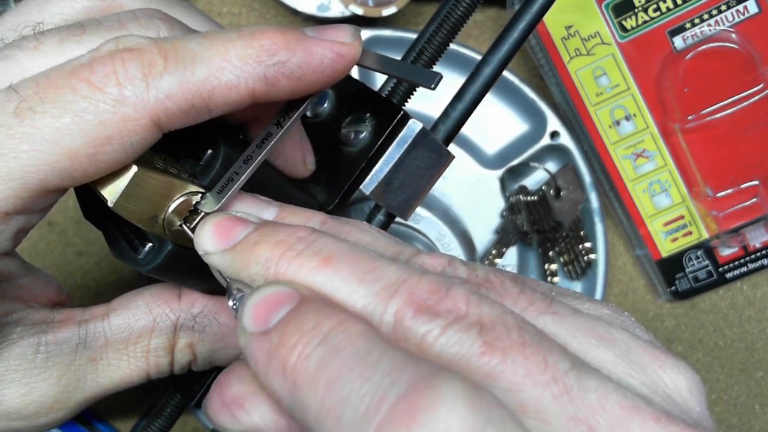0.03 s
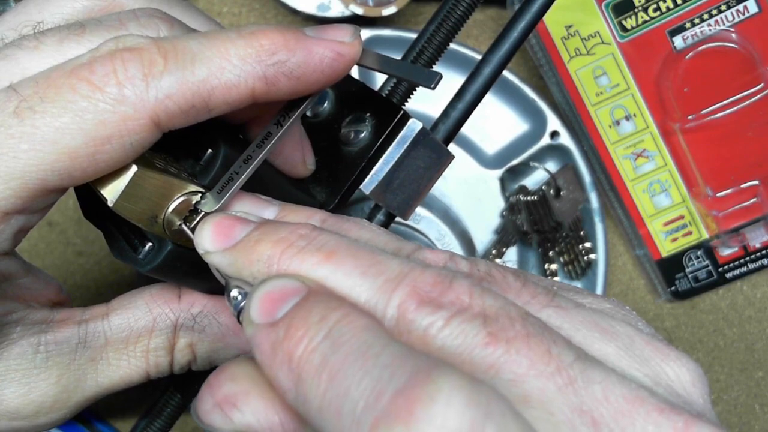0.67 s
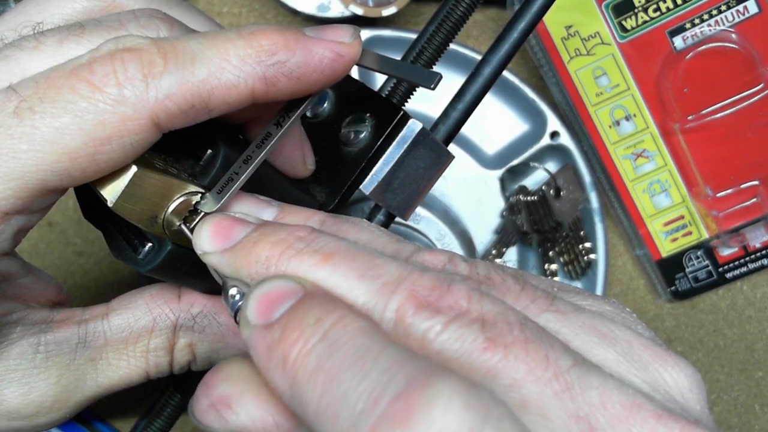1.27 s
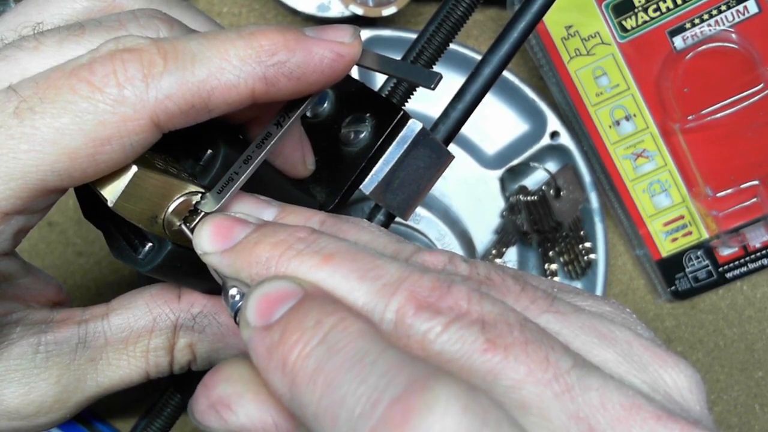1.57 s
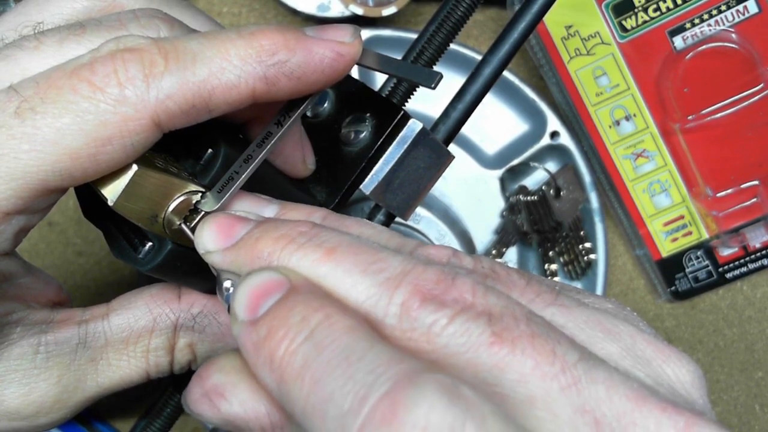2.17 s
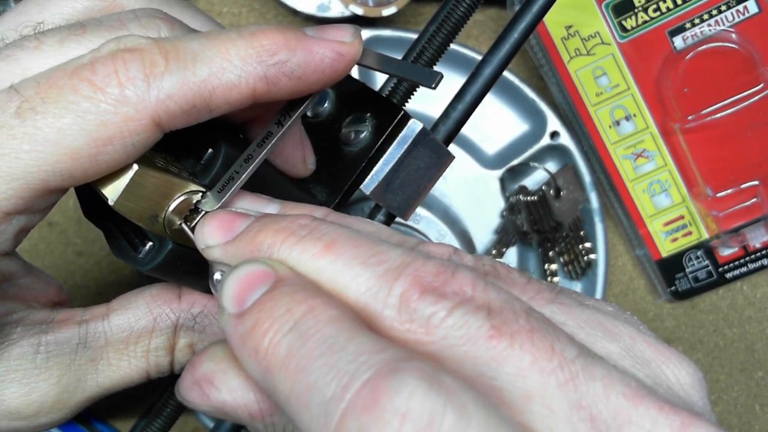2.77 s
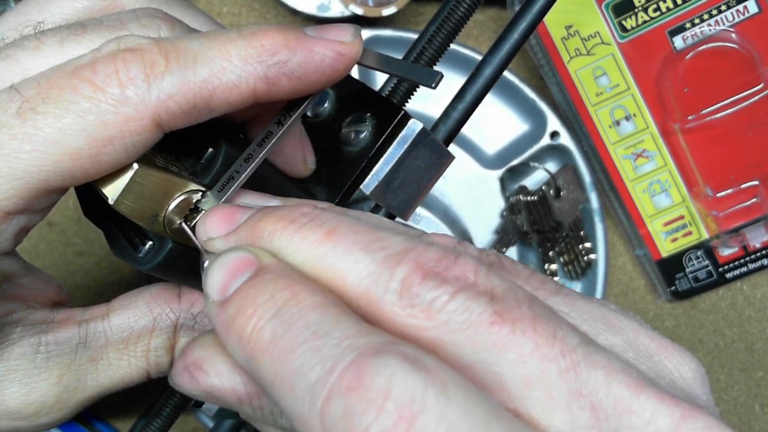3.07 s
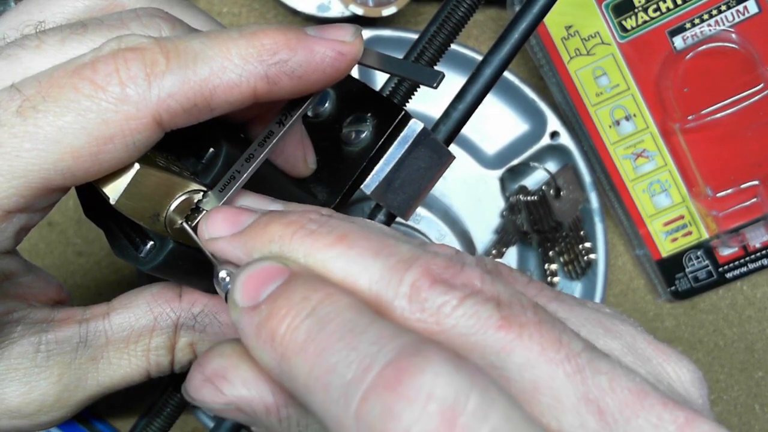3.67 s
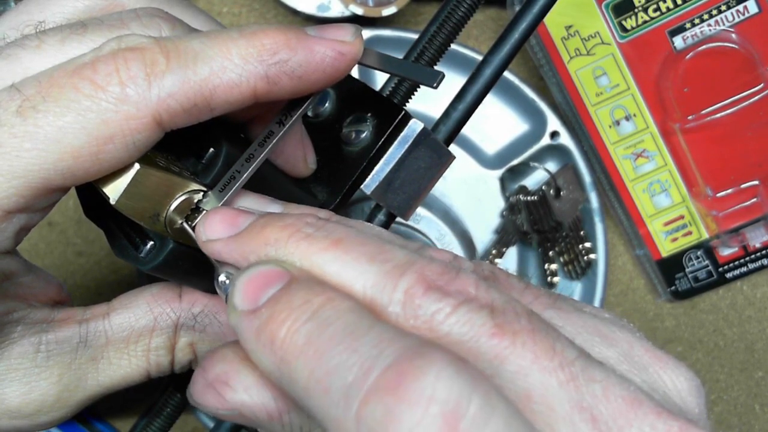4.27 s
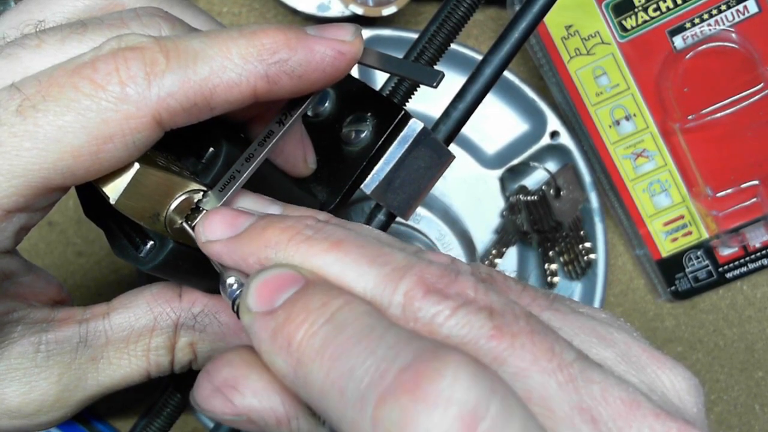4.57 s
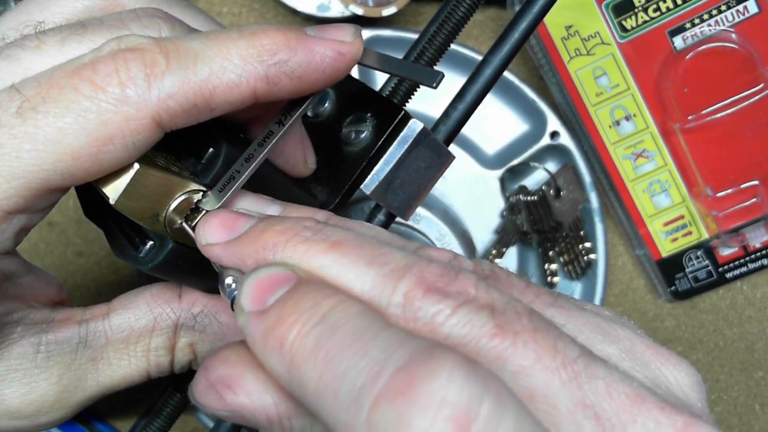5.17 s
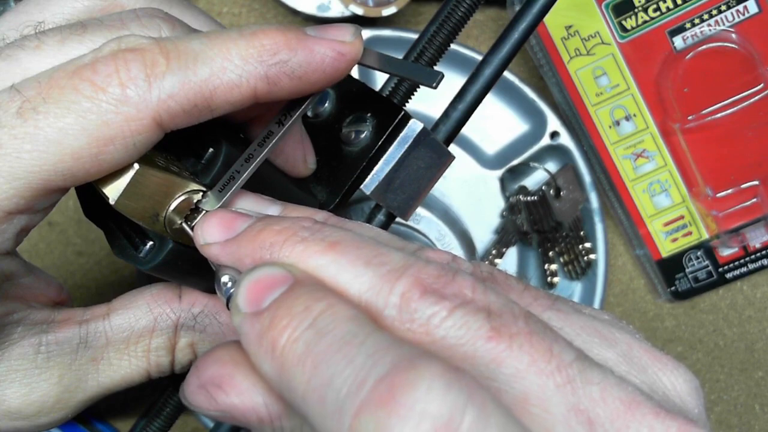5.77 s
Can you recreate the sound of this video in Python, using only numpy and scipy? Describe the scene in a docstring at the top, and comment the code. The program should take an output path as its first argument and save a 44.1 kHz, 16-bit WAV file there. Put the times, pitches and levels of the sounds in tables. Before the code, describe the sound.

Close, quiet lock picking at a workbench: thin steel clicks and tiny scrapes come at uneven intervals as a pick pushes the pins of a padlock. Fingers rub and bump the vise, giving soft dull knocks and deep shudders. The sharpest snaps come after about two seconds and again past the middle. A steady hiss and faint traffic lie underneath, and a far motor whines upward late on.

```python
"""Steel scrapes and snaps over dull knocks: a pick works the pins of a padlock held in a small vise.
Each contact excites the resonances of pick and lock, each push rings the damped modes of the vise,
and the hands set the bench, with the camera on it, swaying at a very low pitch.
Behind the microphone's hiss, faint traffic swells, thin tones come and go, and a far motor runs up."""
import sys
import numpy as np
from scipy import signal
from scipy.fft import rfft, irfft, next_fast_len
from scipy.io import wavfile
from scipy.ndimage import uniform_filter1d, map_coordinates

SR = 44100
rng = np.random.default_rng(int(sys.argv[2]) if len(sys.argv) > 2 else 0)


def dump(signal):
    """Clip the signal to [-1, 1] and save it as 16-bit WAV at the path in sys.argv[1]."""
    limited = np.clip(np.atleast_2d(signal).T, -1, 1)
    pcm = np.round(limited * 32767).astype(np.int16)
    wavfile.write(sys.argv[1], SR, pcm)


N = 260631

BAND_LIMIT_HZ = 15750
# normal modes of the clamped lock: pitch_hz, level_db, t60_s
VISE_MODES = [(180.9, 4, 0.18), (308, -9.5, 0.079), (396.5, 2, 0.073), (453, -13.5, 0.13),
              (537, -15.5, 0.18)]


def pin_snaps(snap=2.9, chatter=0.44, tail_db=-29, tail_t60_s=0.32):
    """Impulse excitation: a pin lets go with one snap, chatters briefly and dies away in a faint room tail."""
    # pin releases: start_s, relative_db, chatter_t60_s, centre_hz, spread_octaves, ring_db
    releases = [(2.0057, -63.5, 0.027, 9000, 1.8, -3), (2.204, -54, 0.014, 9000, 1.4, 6),
                (2.2176, -41.5, .011, 6000, 1.15, 5), (2.2228, -59, .012, 9300, .8, 0),
                (2.2178, -47, 0.016, 4020, 0.094, 1.5), (2.246, -62, 0.0202, 1483, 0.22, -6),
                (2.548, -67, .02, 11700, .15, -2), (2.645, -64, 0.023, 2600, 0.37, -11),
                (2.9385, -63, .005, 10000, 1.8, -6), (3.06, -66.5, .015, 5970, 0.77, 2),
                (3.174, -64, 0.017, 6100, 1.5, -6), (3.3064, -53, .005, 12000, .6, -16),
                (3.3117, -49.5, .007, 7000, .65, -12), (3.3265, -62, .008, 7000, .5, -8),
                (3.4286, -50.5, 0.023, 1030, 0.82, -4), (3.4286, -47, 0.0091, 5300, 0.69, -25),
                (3.438, -57, 0.0076, 8070, 1.7, -12.5), (3.524, -65, 0.0095, 7000, 1, 2),
                (4.5297, -49.5, .012, 5700, .6, -3), (4.5314, -49.5, .014, 5200, .45, -2),
                (4.543, -46.5, .011, 2000, 1.9, -9), (5.627, -70, .04, 4060, .12, 1)]
    out, t = np.zeros(N), np.arange(SR // 10) / SR
    for start_s, relative_db, t60_s, centre_hz, spread_octaves, ring_db in releases:
        decay = amp(-60 * t / t60_s) + amp(tail_db - 60 * t / tail_t60_s)
        force = chatter * rng.standard_normal(len(t)) * decay
        force[0] = snap
        click = amp(relative_db - 3) * steel(force, centre_hz, spread_octaves, ring_db)
        add(out, start_s - 64 / SR, click)  # the steel's response has a 64-sample lead-in
    return out


def pick_scrapes(grain_db=3, ring_db=-4):
    """Stick-slip friction: the pick slides along the keyway in short swells of tiny uneven slips."""
    # strokes of the pick: middle_s, length_s, level_db, centre_hz, spread_octaves
    strokes = [(1.052, 0.02, -62.5, 940, 0.68), (1.053, 0.028, -76.5, 6700, 0.3),
               (1.064, .024, -83.5, 4100, 0.09), (1.96, .03, -85, 5000, 0.89),
               (2.009, 0.023, -72.5, 900, 0.87), (2.16, 0.034, -85, 7350, .2),
               (2.191, 0.039, -78, 5000, 0.86), (2.208, 0.067, -69.5, 1100, 0.89),
               (2.209, .016, -73, 6000, 1.6), (2.959, .08, -85, 12500, 0.27),
               (3.012, 0.15, -86, 7500, 0.68), (3.429, 0.068, -77.5, 7000, 1.8),
               (3.597, 0.21, -89, 6960, 0.4), (3.671, 0.049, -83.5, 8000, 0.89),
               (4.544, 0.012, -67, 1600, 0.82), (5.116, .05, -83.5, 6550, 0.3)]
    out = np.zeros(N)
    for middle_s, length_s, level_db, centre_hz, spread_octaves in strokes:
        slips, sizes = rng.standard_normal((2, SR // 2))[:, :int(length_s * SR)]
        force = unit(slips * amp(grain_db * sizes)) * signal.windows.tukey(len(slips), .8)
        scrape = amp(level_db) * steel(force, centre_hz, spread_octaves, ring_db)
        add(out, middle_s - length_s / 2, scrape)
    return out


def steel(force, centre_hz, spread_octaves, ring_db, contact_db=1):
    """Modal superposition: a contact drives one band, heard directly and through the steel's modes."""
    # resonances of pick and lock body: pitch_hz, width_hz, gain_db
    modes = [(740, 90, 2), (950, 70, 2), (1190, 80, 4), (1400, 100, 5), (2900, 300, 2), (4060, 160, 16),
             (4880, 200, 12), (5420, 160, 7), (6850, 160, 7), (7780, 250, 10), (8300, 150, 7),
             (8950, 200, 7), (9510, 200, 11), (10100, 200, 6), (11800, 350, 10), (12390, 200, 6),
             (13050, 200, 2), (14500, 600, 2)]
    coupling_db = ring_db + contact_db * rng.standard_normal(len(modes))  # varies with contact point
    def response(f):
        ring = sum(amp(db + touch_db) * 1j * f * width / (hz * hz - f * f + 1j * f * width)
                   for (hz, width, db), touch_db in zip(modes, coupling_db))
        band = np.exp(-.5 * (np.log2((f + 1) / centre_hz) / spread_octaves) ** 2)
        return unit((1 + ring) * band * (f < BAND_LIMIT_HZ))
    return filtered(np.pad(force, (64, SR // 20)), response)


def vise_knocks(detune=0.0063):
    """Damped free vibration: after each bump the modes of the clamped lock decay exponentially."""
    # pushes and bumps on the vise: start_s, level_db, rise_s, upper_modes_db
    knocks = [(.563, -60.5, 0.0018, -1), (1.954, -54, 0.017, 0.5), (2.011, -49.5, 0.0015, 0.5),
              (2.198, -50.5, 0.0024, 1.5), (2.522, -61, 0.0029, -6), (2.945, -51.5, 0.0065, -7),
              (2.99, -57, 0.0062, -8), (3.389, -59.5, 0.0076, 1), (3.4289, -65, 0.001, 6.5),
              (4.524, -58.5, 0.0047, 5), (4.545, -55, 0.0059, 6.5)]
    out, t = np.zeros(N), np.arange(SR // 2) / SR
    for start_s, level_db, rise_s, upper_db in knocks:
        grip = 1 + detune * rng.standard_normal(len(VISE_MODES))  # the fingers shift each mode a little
        ring = sum(amp(db + upper_db * (k > 0) - 60 * t / t60_s) * np.sin(2 * np.pi * hz * grip[k] * t)
                   for k, (hz, db, t60_s) in enumerate(VISE_MODES))
        add(out, start_s, amp(level_db) * ring * (1 - np.exp(-t / rise_s)))
    return out


def finger_rubs(lowest_width_hz=24, upper_width_hz=90):
    """Forced vibration: the friction of skin on the vise keeps its modes murmuring."""
    # fingers dragging: middle_s, length_s, level_db, upper_modes_db
    rubs = [(0.261, .5, -78, 7.5), (0.827, 0.12, -68.5, -17), (1.312, .2, -77.5, -16),
            (1.794, 0.16, -71, -12), (3.051, 0.29, -67.5, -5.5), (3.59, .26, -70.5, -9)]
    out = np.zeros(N)
    widths = [lowest_width_hz] + [upper_width_hz] * (len(VISE_MODES) - 1)
    for middle_s, length_s, level_db, upper_db in rubs:
        def body(f):
            return sum(amp(db + upper_db * (k > 0)) / (1 + ((f - hz) / width) ** 2) / np.sqrt(width)
                       for k, ((hz, db, _), width) in enumerate(zip(VISE_MODES, widths)))
        drag = unit(filtered(rng.standard_normal(SR), body)[:int(length_s * SR)])
        add(out, middle_s - length_s / 2, amp(level_db) * drag * signal.windows.tukey(len(drag), .8))
    return out


def bench_sway(rock_hz=28.15, tremor_db=-43, swell_s=0.033, beat_s=0.11, beat_loss_db=7.5):
    """Resonance: bench and camera mount rock in their lowest mode, each push dying away in beats."""
    # the hands lean on the bench or let go: peak_s, level_db
    pushes = [(.07, -45), (0.661, -41), (.81, -37.5), (1.89, -32.5), (2.03, -33), (2.105, -24.5),
              (2.295, -18.5), (2.63, -33), (3.001, -36), (3.108, -26.5), (3.498, -35), (3.789, -33),
              (4.63, -21.5), (5.0, -39.5), (5.702, -32.5)]
    t = np.arange(N) / SR
    power = (amp(tremor_db) * np.tanh(wobble(11))) ** 2  # hands at rest
    for peak_s, level_db in pushes:
        for beat in range(3):
            swell = np.exp(-((t - peak_s - beat * beat_s) / swell_s) ** 2)
            power += amp(level_db - beat * beat_loss_db) ** 2 * swell
    envelope = uniform_filter1d(np.sqrt(power), SR // 45)
    rocking = tone(rock_hz * np.exp(.08 * wobble(14)))
    shudder = noise([(20, -10), (36, 0), (48, -3), (62, -30), (110, -60), (300, -120)])
    return envelope * (rocking + amp(-15) * shudder)


def traffic():
    """Incoherent sources add: four bands of road noise swell, each at its own rate, as vehicles near."""
    # spectra of the road noise: frequency_hz, density_db
    rumble_spectrum = [(30, -10), (70, 8), (88, 8), (140, -3.5), (200, -5.5), (270, -6.5), (390, -7),
                       (520, -14), (700, -18), (2000, -62)]
    drone_spectrum = [(30, -16), (65, 9.5), (105, -10.5), (135, -4.5), (190, -8.5), (260, -4.5),
                      (340, -15.5), (700, -50.5)]
    tyre_spectrum = [(400, -25.5), (700, -12.5), (830, -2), (1020, -9.5), (1180, -1), (1250, -4.5),
                     (1400, -1.5), (1700, -12.5), (2500, -28), (5000, -43.5)]
    rush_spectrum = [(1200, -37.5), (1800, -4), (2500, 0), (3400, -8), (7000, -17.5), (14000, -39.5)]
    near_db, bass_db = traffic_strength_db(bass=False), traffic_strength_db(bass=True)
    rumble = amp(-63 + 1.216 * bass_db + wobble(6.3)) * noise(rumble_spectrum)
    drone = amp(-65 + 2.6 * bass_db) * noise(drone_spectrum)
    tyres = amp(-73 + .85 * near_db + wobble(8)) * noise(tyre_spectrum)
    rush = amp(-83 + .75 * near_db) * noise(rush_spectrum)
    return rumble + drone + tyres + rush


def traffic_strength_db(bass, steady_road_db=-10):
    """Inverse-square law: each vehicle's power rises and falls with distance, above a steady road."""
    # far vehicles passing: nearest_s, relative_db, half_length_s, extra_bass_db
    vehicles = [(.15, -3, 0.26, -5), (5.55, -0.5, 0.67, 0.5)]
    t = np.arange(N) / SR
    passing = sum(amp(db + bass * extra_bass_db) ** 2 / (1 + ((t - nearest_s) / half_length_s) ** 2)
                  for nearest_s, db, half_length_s, extra_bass_db in vehicles)
    return 10 * np.log10(amp(steady_road_db) ** 2 + passing)


def distant_motor(idle_hz=425, full_hz=1318, midway_s=4.515, run_up_s=.31, start_s=3.45, fade_s=0.29):
    """Multipath propagation: a rising whine arrives blurred, and reflects once from a building."""
    # housing resonances that the whine climbs through: pitch_hz, half_width_hz, boost_db
    housing = [(500, 10, 5), (590, 16, 10.5), (793, 36, 15.5), (986, 18, 11.5)]
    t = np.arange(N) / SR
    pitch_hz = idle_hz + (full_hz - idle_hz) / (1 + np.exp((midway_s - t) / run_up_s))
    boost_db = sum(db / (1 + ((pitch_hz - hz) / width) ** 2) for hz, width, db in housing)
    level_db = -81 + 6 * np.log2(pitch_hz / full_hz) + boost_db  # 6 dB louder per octave
    paths = wobble(44) + 1j * wobble(44)  # random amplitude and phase
    blurred = np.real(paths * np.exp(2j * np.pi * np.cumsum(pitch_hz) / SR))
    fade_in = np.clip((t - start_s) / fade_s, 0, 1)
    whine = fade_in * amp(level_db) * unit(blurred)
    out = whine.copy()
    add(out, 0.17, amp(-4) * whine)  # the echo
    return out


def distant_tones(fade_s=.1, flicker_db=1.5, waver_hz=2):
    """Random modulation: thin far tones come and go, wavering slightly in level and pitch."""
    # distant tones: start_s, end_s, pitch_hz, level_db
    tones = [(3.05, 4.15, 598, -87), (3.2, 4.9, 1319, -88), (5.42, 6, 1179, -77)]
    out, t = np.zeros(N), np.arange(N) / SR
    for start_s, end_s, pitch_hz, level_db in tones:
        gate = np.clip(np.minimum(t - start_s, end_s - t) / fade_s, 0, 1)
        out += gate * amp(level_db + flicker_db * wobble(10)) * tone(pitch_hz + waver_hz * wobble(30))
    return out


def microphone_hiss(level_db=-80.5):
    """Self-noise: the microphone adds an even broadband floor."""
    # spectrum of the hiss: frequency_hz, density_db
    spectrum = [(500, 2.5), (1800, -2), (3200, -4), (4000, -2), (4600, -3.5), (8000, -4), (15500, -5)]
    return amp(level_db) * noise(spectrum)


def amp(db):
    """Decibels as an amplitude ratio."""
    return 10 ** (np.asarray(db) / 20)


def unit(x):
    """Normalisation to rms 1."""
    return x / np.sqrt(np.mean(x ** 2) + 1e-30)


def wobble(rate_hz):
    """Spline interpolation: a smooth curve through rate_hz random values a second."""
    return map_coordinates(rng.standard_normal(int(N * rate_hz / SR) + 4), [np.arange(N) * rate_hz / SR])


def filtered(x, response):
    """Linear filtering: the spectrum of x times a complex frequency response."""
    size = next_fast_len(len(x) + 8192)
    return irfft(rfft(x, size) * response(np.fft.rfftfreq(size, 1 / SR)), size)[:len(x)]


def noise(spectrum):
    """Spectral shaping: noise of rms 1 coloured by (frequency_hz, density_db) points."""
    hz, db = np.transpose(spectrum)
    return unit(filtered(rng.standard_normal(N), lambda f: amp(np.interp(np.log(f + 1), np.log(hz), db))))


def tone(pitch_hz):
    """Phase is the integral of frequency: a sine of rms 1 follows a pitch curve."""
    return np.sqrt(2) * np.sin(2 * np.pi * np.cumsum(pitch_hz) / SR)


def add(track, start_s, sound):
    """Mix a sound into the track from start_s on."""
    start = max(round(start_s * SR), 0)
    track[start:start + len(sound)] += sound[:max(N - start, 0)]


def scene():
    """Superposition: the work at the bench and its background sum at the microphone."""
    picking = pin_snaps() + pick_scrapes() + vise_knocks() + finger_rubs() + bench_sway()
    return picking + traffic() + distant_motor() + distant_tones() + microphone_hiss()


def record(dry):
    """Low-pass filtering: the camera keeps nothing above its band limit."""
    return filtered(dry, lambda hz: hz < BAND_LIMIT_HZ)


dry = scene()
out = record(dry)
dump(out)
```